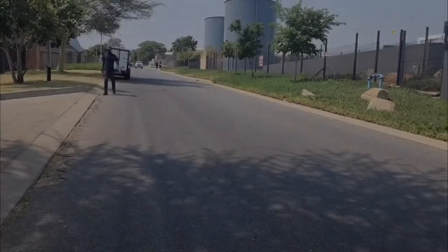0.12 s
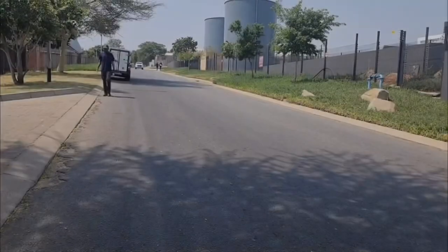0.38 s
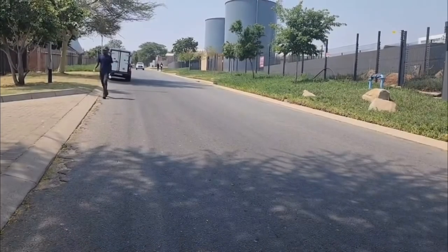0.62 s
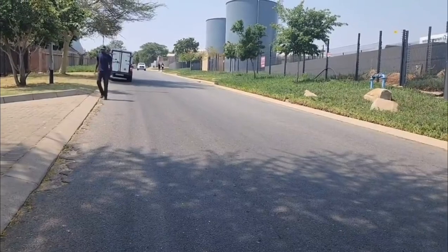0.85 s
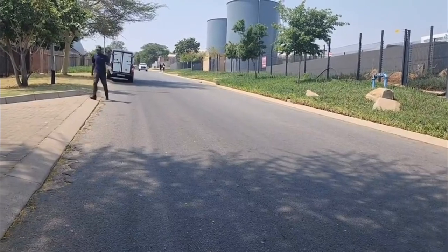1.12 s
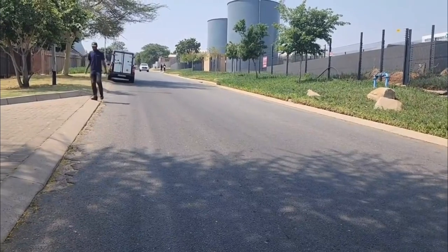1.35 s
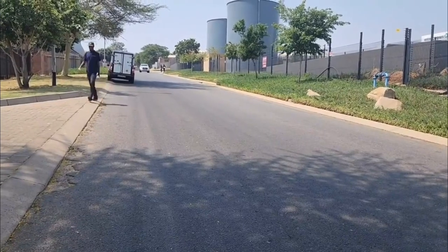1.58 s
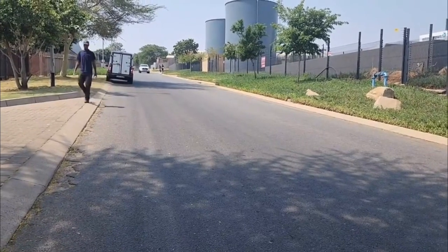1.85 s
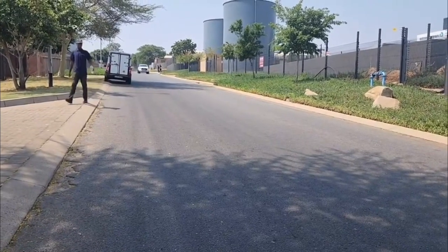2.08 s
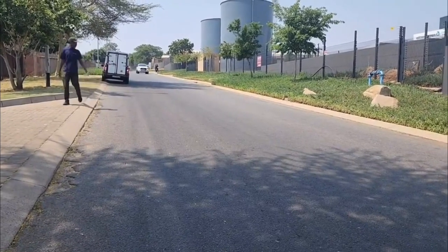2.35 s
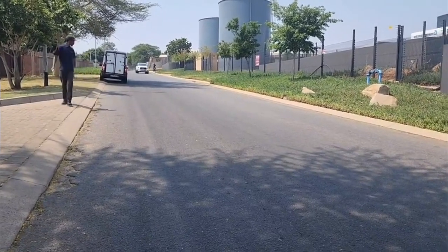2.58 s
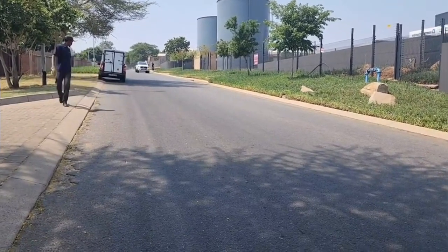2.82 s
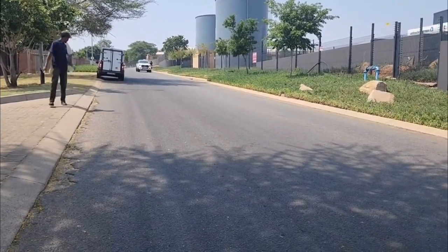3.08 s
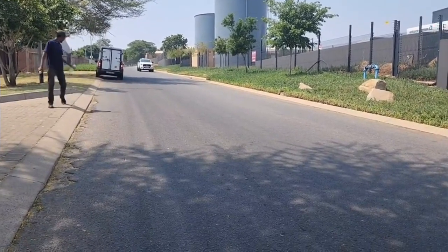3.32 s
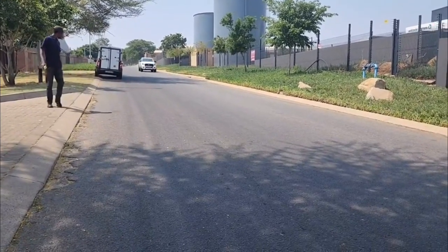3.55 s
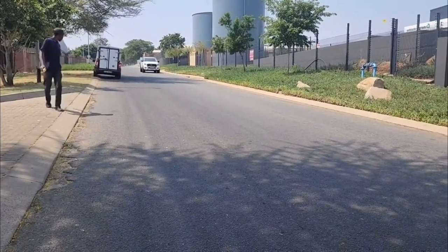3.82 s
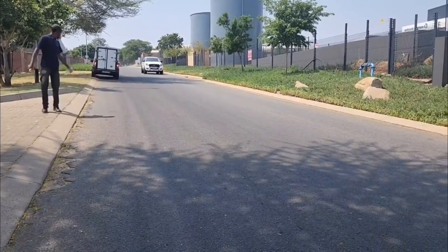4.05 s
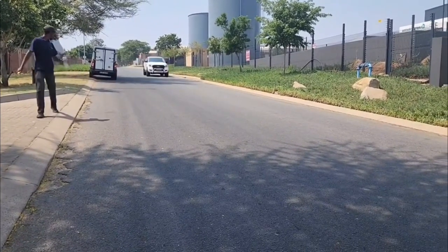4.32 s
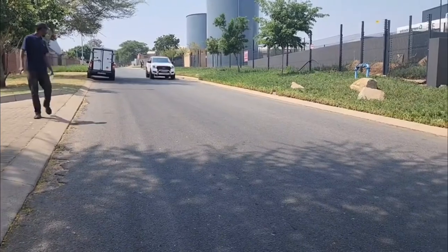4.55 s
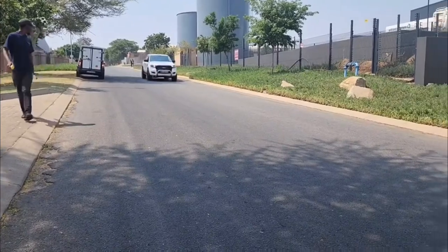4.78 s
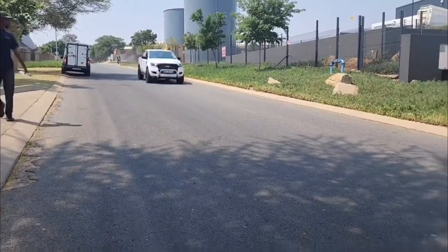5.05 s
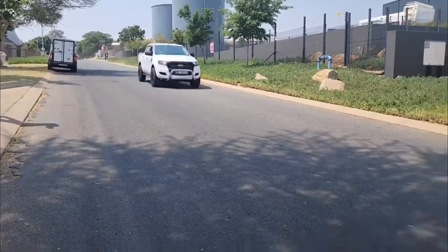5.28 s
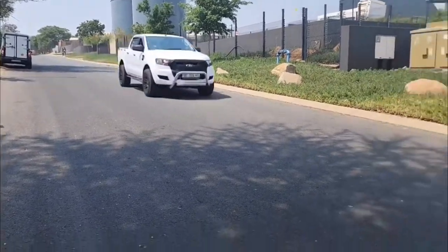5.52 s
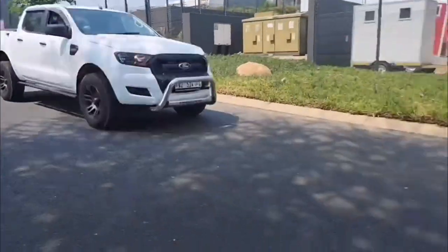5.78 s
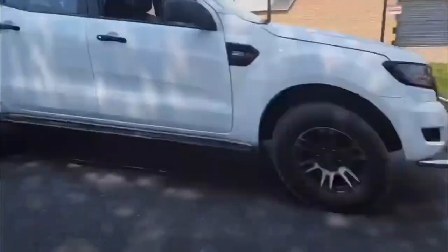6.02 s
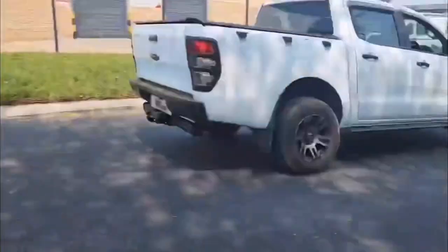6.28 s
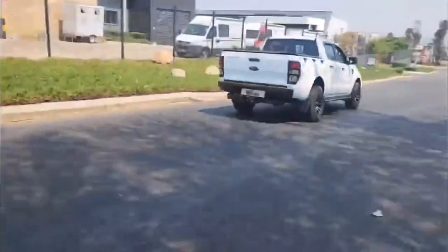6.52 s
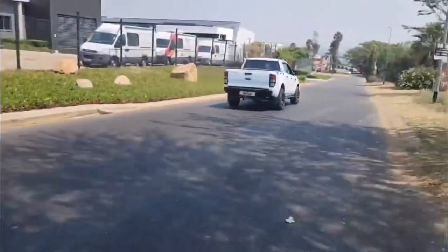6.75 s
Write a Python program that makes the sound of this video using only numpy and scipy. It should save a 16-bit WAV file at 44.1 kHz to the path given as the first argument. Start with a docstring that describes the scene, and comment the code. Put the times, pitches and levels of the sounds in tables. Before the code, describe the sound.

Wavering low diesel drone swells over faint street noise and small scuffs, bursts into exhaust roar, clatter and tyre hiss passing close, then eases.

```python
"""Diesel pickup pass-by

A four-cylinder diesel pickup with an open exhaust accelerates towards a phone at the kerb, changes gear, passes.
Wavering near-sines locked to crank and fan drone over shaped noise: rumble, exhaust roar, clatter, tyre hiss.
Envelopes on noise make a shoe scuff, rustle and ticks nearby; noise on a sine carrier makes a high rasp and chirps.
Steady noise gives far traffic, with fading tyre hiss and hum; light wind thuds on each microphone port apart.
"""
import sys
import numpy as np
from scipy import signal
from scipy.fft import rfft, irfft, next_fast_len
from scipy.io import wavfile
from scipy.ndimage import uniform_filter1d, map_coordinates

SR = 44100
rng = np.random.default_rng(int(sys.argv[2]) if len(sys.argv) > 2 else 0)


def unload_wav(signal):
    """Save mono or channel-first audio to the path in sys.argv[1] as 16-bit WAV at rate SR, clipped to [-1, 1]."""
    wavfile.write(
        sys.argv[1],
        SR,
        np.round(np.clip(np.atleast_2d(signal).T, -1, 1) * 32767).astype(np.int16),
    )


def natural_amplitude(level_db):
    """Convert a level in decibels to a linear amplitude factor, elementwise."""
    exponent = np.asarray(level_db, float) / 20
    return 10 ** exponent


N = 303470
T = np.arange(N) / SR
M = next_fast_len(N + SR // 8)  # transform length
HZ = np.maximum(np.arange(M // 2 + 1) * SR / M, 1)

# Spectra and multiples hold relative levels; mode widths are at half amplitude.
# wind thuds: f/Hz, level/dB
WIND_SPECTRUM = [(15, -8), (35, 6), (70, -7), (130, -3.0), (250, -44.0)]
# gusts dying down: t/s, level/dB
WIND_LEVEL = [(0, -47), (.6, -50), (2, -52), (3, -58), (5, -63), (6.88, -66)]
# distant traffic: f/Hz, level/dB
STREET_SPECTRUM = [(15, -37), (25, -6), (55, 1), (80, -4), (110, 4), (160, -19.5), (221, -5.5), (298, -7.5),
                   (528, -4), (936, -57), (1100, -50), (1450, -4.5), (6000, -48), (7800, -73),
                   (13200, -120)]
STREET_DB = -41
# another car's tyre hiss: f/Hz, level/dB
FAR_TYRE_SPECTRUM = [(1800, -39), (3200, -4), (4500, 1), (6000, -1), (7600, -4.5), (8300, -13), (8900, -39),
                     (10000, -60)]
# its level, fading down the road: t/s, level/dB
FAR_TYRE_LEVEL = [(0, -53.5), (.6, -59.5), (1.2, -56.5), (2, -76), (6.88, -68)]
FAR_HUM_HZ, FAR_HUM_WIDTH_HZ, FAR_HUM_DB = 600, 260, -44.5
FAR_HUM_ATTACK_S, FAR_HUM_HOLD_S, FAR_HUM_RELEASE_S = 0.18, 0.64, 0.37

# shoe dragged over paving: start t/s, hold/s, level/dB
SCUFFS = [(2.731, 0.096, -33), (2.85, 0.096, -39.5), (2.979, 0.036, -44)]
SCUFF_ATTACK_S, SCUFF_RELEASE_S = 0.0046, 0.016
# scuff grit: f/Hz, level/dB
GRIT_SPECTRUM = [(880, -34), (1500, -4), (2350, -6), (2870, -6.5), (7320, -12), (8950, -26), (10200, -35),
                 (11900, -28), (13400, -39)]
# faint bright rustle: start t/s, hold/s, level/dB
RUSTLES = [(0, .62, -75), (.84, 0.074, -67)]
# rustle: f/Hz, level/dB
RUSTLE_SPECTRUM = [(7000, -19), (8800, 0), (10000, -6), (12000, 0), (13400, -11)]
# dry ticks: t/s, rms level at onset/dB
TICKS = [(.385, -58), (.485, -58), (.655, -43), (.691, -56), (1.934, -35)]
# ticks: f/Hz, level/dB
TICK_SPECTRUM = [(1500, -16), (4000, 7), (13000, -19)]
TICK_DECAY_S = 0.0069
# high chirps: t/s, centre f/Hz, level before attack and decay/dB
CHIRPS = [(2.632, 7460, -43), (2.81, 7270, -41), (2.9, 7344, -45), (2.985, 7410, -43.5)]
CHIRP_HALF_WIDTH_HZ, CHIRP_ATTACK_S, CHIRP_DECAY_S = 860, 0.0094, 0.043
# high rasp: t/s, centre f/Hz, level/dB
RASP = [(2.28, 6600, -70), (2.38, 6600, -48), (2.462, 6270, -45), (2.536, 6680, -37), (2.6, 7000, -62)]
RASP_HALF_WIDTH_HZ, RASP_THROB_HZ = 450, 85.5

# engine: t/s, received firing rate f/Hz, load on roar, clatter and fan tones/dB
ENGINE = [(0.0, 104.6, 0.4), (0.5, 109.9, -1.1), (1.0, 114.7, -0.4), (1.3, 116.9, 1.5), (1.6, 119.3, 2.5),
          (1.92, 123.6, 1.3), (2.12, 113.5, -0.4), (2.36, 107.1, -1.9), (2.75, 108.1, 1.5),
          (3.45, 111.9, 2), (3.75, 110.6, 2.5), (3.98, 109.5, 1), (4.14, 104.5, 0.7), (4.3, 104.3, 0.9),
          (4.65, 102.7, 0.1), (5.12, 105.8, -0.3), (5.5, 109.4, 0.64), (6.02, 113.4, -2.5),
          (6.2, 112.1, -0.2), (6.42, 106.3, 0.9), (6.88, 105.9, -0.3)]
# two main firing tones, swelling and sinking with wall echoes: t/s, 1 x level/dB, 2 x level/dB
DRONE = [(0.05, -43.5, -42), (0.33, -28.5, -41.5), (0.47, -39, -40), (0.66, -39, -43), (1.1, -36.5, -47.5),
         (1.4, -35.5, -35), (1.5, -26.5, -39), (1.93, -34, -34), (2.05, -30, -42.5), (2.2, -33, -41.5),
         (2.45, -29, -36), (2.6, -35.5, -38), (2.73, -27.5, -34.5), (2.86, -37, -43), (2.96, -27, -35.5),
         (3.3, -29.5, -38.5), (3.55, -28, -37.5), (3.72, -31, -30.5), (3.93, -44, -31),
         (4.08, -27.5, -30.5), (4.16, -30, -49), (4.27, -34, -31.5), (4.52, -23, -26.5), (4.73, -26, -24),
         (5.3, -20, -25), (5.44, -22, -19.5), (5.6, -15.5, -19), (5.69, -26, -20), (5.78, -14.5, -17),
         (5.95, -18, -16), (6.02, -25, -19.5), (6.09, -14, -17.5), (6.17, -26, -18.5), (6.25, -17, -20),
         (6.44, -24.5, -21), (6.8, -22, -28), (6.88, -18.5, -21)]
# side tones: t/s, uneven-firing level/dB, 3 x firing level/dB, fan blade level before BLADE_LIFT_DB/dB
SIDE_TONES = [(0, -43.5, -67, -65), (.5, -43.5, -49.5, -58), (1.0, -45, -48, -55), (1.4, -48, -54, -47.5),
              (1.9, -40, -51, -46), (2.2, -40.5, -45, -48), (2.6, -39, -49, -48.5),
              (3.0, -34.5, -45, -45.5), (3.4, -37, -42.5, -47.5), (3.8, -32, -44.5, -42),
              (4.2, -30, -39, -39), (4.6, -26, -43, -49), (5.0, -29, -33.5, -43), (5.4, -33, -31, -34.5),
              (5.8, -20, -38, -33), (6.2, -20, -30, -53), (6.6, -31, -43, -50), (6.88, -28.5, -39, -41)]
BLADE_LIFT_DB = 1
# unequal cylinders: multiples of firing rate, level/dB (two rows)
UNEVEN = ([.75, 1.5, 2.5, 2.75], [-18, -14, -13, -17])
# strongest quarter multiples: t/s, then level/dB of each of QUARTER_ORDERS
QUARTERS = [(.2, -54, -59, -46.5, -57, -57), (.7, -52, -58, -52.5, -57, -49),
            (1.2, -54, -56, -51, -52, -51), (1.8, -44, -47, -57.5, -58, -58),
            (2.3, -49, -49, -49, -60, -62), (2.7, -55, -47, -42.5, -61, -57),
            (3.1, -51, -45, -43, -46, -63), (3.5, -40.5, -50, -39.5, -46, -68),
            (3.9, -35, -36, -37.5, -41, -50), (4.3, -42, -40, -38, -63, -37.5),
            (4.7, -49, -35, -37, -52, -52), (5.1, -42, -34, -36, -59, -40), (5.5, -33, -34, -30, -38, -34),
            (5.9, -27, -30, -25.5, -28, -31), (6.2, -24, -40, -26, -32.5, -31),
            (6.5, -24.5, -26, -30, -29, -35), (6.88, -30, -38, -35.5, -34.5, -39)]
# their multiples of firing rate
QUARTER_ORDERS = (1.25, 1.75, 2.25, 5, 5.25)
# weaker tones of the belt-driven fan: multiples of its turn, level/dB (two rows)
FAN = ([3, 7, 9, 11], [-5, -16, -18, -19])
FAN_RATIO = .601  # fan turns per firing, before belt slip
# belt-drive whine: t/s, 13 x fan turn level/dB, 14 x level/dB
WHINE = [(0, -70, -70), (1.2, -66, -70), (1.35, -47, -70), (1.9, -43, -65), (2.15, -47, -60),
         (2.4, -45, -55), (2.9, -44, -47), (3.2, -46, -46), (3.6, -47, -45), (4.0, -46, -50),
         (4.3, -43, -52), (4.7, -45, -48), (5.4, -38, -42), (5.8, -46, -46), (6.3, -50, -48),
         (6.6, -50, -38), (6.88, -55, -42)]
# tones favoured by the tailpipe: multiples of firing rate, level/dB (two rows)
PIPE = ([3.75, 4.25, 4.75, 5.75, 7.5], [-11, -1, 0, -6, -13])
# their level, clear once the pipe points at the phone: t/s, level/dB
PIPE_LEVEL = [(0, -61), (2, -62), (3.5, -52), (4.5, -46), (5.1, -37), (5.6, -41), (6.2, -47), (6.32, -33),
              (6.6, -31.5), (6.88, -32)]

# low rumble: f/Hz, level/dB
RUMBLE_SPECTRUM = [(30, -25), (45, -10), (60, -6), (85, -4.5), (150, -4), (260, -15), (400, -82)]
# exhaust roar: f/Hz, level/dB
ROAR_SPECTRUM = [(70, -9.5), (140, -2), (220, 0.5), (320, -7), (420, -2), (500, -5), (600, -1.5),
                 (750, -6.5), (1100, -11), (2000, -70)]
# front clatter: f/Hz, level/dB
CLATTER_SPECTRUM = [(500, -41), (760, -6.5), (1150, -17.5), (1700, -11), (2300, -26), (2750, -20),
                    (3600, -17), (4600, -19.5), (6000, -28.5)]
# engine-bay ringing: f/Hz, width/Hz, level/dB
BLOCK_MODES = [(903, 110, -3.5), (1360, 231, -1), (1703, 210, -12), (2068, 380, -8.5), (2484, 210, -11.5),
               (2977, 180, -14.5), (3450, 180, -19)]
# rear clatter: f/Hz, level/dB
TAIL_SPECTRUM = [(500, -32.5), (760, -7), (1100, -8.5), (1600, -5.5), (2200, -19), (3000, -17), (4000, -15),
                 (6000, -30)]
# ringing under the load bed: f/Hz, width/Hz, level/dB
BED_MODES = [(532, 63, 5), (913, 82, -8), (1360, 93, -1.5), (1790, 60, -3.5), (4220, 180, -9)]
# front tyre roar ringing in the wheel arches: f/Hz, width/Hz, level/dB
ARCH_MODES = [(565, 115, 1), (723, 73, -8), (882, 160, -0.5)]
# its level: t/s, level/dB
ARCH_LEVEL = [(0, -57), (2, -48.5), (3.5, -40), (4.5, -35.5), (5.1, -29.5), (5.45, -22), (5.8, -19),
              (6.1, -22), (6.3, -26), (6.42, -33), (6.88, -38)]
# tyre hiss: f/Hz, level/dB
HISS_SPECTRUM = [(1800, -37), (3200, -2.5), (4500, 0.5), (6000, -4), (7600, -3), (8300, -9), (8700, -26),
                 (9400, -51)]
# airy top of the hiss: f/Hz, level/dB
AIR_SPECTRUM = [(8000, -35), (8800, 9), (10000, 1), (11600, 4.5), (13400, -6)]
# rear tyre hiss as the wheel goes by: t/s, level/dB
REAR_WHEEL_LEVEL = [(4.8, -91), (5.6, -47), (6.0, -27.5), (6.12, -25.5), (6.16, -32), (6.2, -24.5),
                    (6.28, -23.5), (6.34, -21), (6.38, -23), (6.41, -29), (6.6, -35.5), (6.88, -54)]
REAR_AIR_DB = -16  # rear air relative to rear hiss

CLOSEST_S, TURN_S, MISS_M, SPEED_M_S, SOUND_M_S = 6.083, 6.554, 3.48, 11.14, 343
SHADE_M = 1.6  # travel over which the body comes between a part and the phone
EAR_M, SOURCE_M, ASPHALT, COHERENT_M = 1.4, 0.64, 0.88, 3.2  # heights, road reflection, its reach
# Paths: level/dB, ahead/m, loss per doubled distance/dB, air loss/dB per m, shading after passing/dB
# crank tone
CRANK_PATH = (-49, -2, -1.5, 0, 10)
# fan tones, same columns
FAN_PATH = (-25.5, 3.5, 8, -0.16, 2)
# rumble, same columns
RUMBLE_PATH = (-33, 1, 1.5, 0.07, -1.5)
# roar, same columns
ROAR_PATH = (-15, 2.5, 6, 0.19, 1.4)
# clatter, same columns
CLATTER_PATH = (-18.5, 3, 4.5, 0.07, -1.5)
# hiss, same columns
HISS_PATH = (-24.5, 1.9, 6.5, 0.24, 1)
# air, same columns
AIR_PATH = (-30.5, -0.6, 7.5, 0.57, 8.5)

# two microphone ports: f/Hz, scattered share/dB, left lead/rad, left minus right/dB
PORTS = [(40, -34, 0, 0), (120, -26, .03, 0), (200, -15, .12, .3), (280, -13, .22, .6), (380, -13, .28, .6),
         (520, -13, .35, .6), (780, -2.5, .9, .3), (1050, -2.5, .8, -1.2), (1300, -1.5, 1.5, -2),
         (1550, -2.5, 3.1, -2), (1800, -.6, 4, -2), (2150, -2, 6.2, -2), (2600, -2, 6.5, -2),
         (3500, -.5, 8.5, -4), (7000, -.1, 12, -4.5), (13000, -.1, 20, -3.5)]
TOP_HZ, DRIVE = 13350, .8


def curves(table):
    """Columns of a time table, sample by sample."""
    s, *columns = np.transpose(table)
    return [np.interp(T, s, c) for c in columns]


def over_hz(table):
    """Columns of a frequency table, bin by bin on a log axis."""
    hz, *columns = np.transpose(table)
    return [np.interp(np.log(HZ), np.log(hz), c) for c in columns]


def colour(table):
    """Gain per bin of a spectrum."""
    return natural_amplitude(over_hz(table)[0])


def ringing(modes):
    """Gain per bin of a set of resonances."""
    return sum(natural_amplitude(db) / (1 + (2 * (HZ - hz) / width_hz) ** 2) for hz, width_hz, db in modes)


def unit(x):
    """Scale to rms 1."""
    return x / np.sqrt(np.mean(x ** 2))


def walk(rate_hz):
    """Random levels held 1 / rate_hz s and slewed twice; spread near 1."""
    k = int(SR / rate_hz)
    held = np.repeat(rng.standard_normal(N // k + 1), k)
    return 1.72 * uniform_filter1d(uniform_filter1d(held, k), k)[:N]


def noise(gain):
    """Two unrelated noises of one colour, rms 1."""
    return unit(irfft(rfft(rng.standard_normal((2, M))) * gain, M)[:, :N])


def patchy(gain, patchy_db, rate_hz):
    """Two unrelated noises of one colour whose fifth-octave bands swell and fade each on their own."""
    white = rfft(rng.standard_normal((2, M))) * gain
    step = 5 * np.log2(HZ)
    heard = step[gain > gain.max() / 30]
    total = 0
    for k in range(int(heard.min()), int(heard.max()) + 2):
        band = irfft(white * np.clip(1 - abs(step - k), 0, 1), M)[:, :N]
        total = total + natural_amplitude(patchy_db * walk(rate_hz)) * band
    return unit(total)


def burst(s, attack_s, hold_s, release_s):
    """Envelope: linear attack, hold, exponential release."""
    attack = np.clip((T - s) / attack_s, 0, 1)
    return attack * np.exp(-np.maximum(T - s - attack_s - hold_s, 0) / release_s)


def gated(table, inside_db):
    """Gain of a curve that is silent outside its span."""
    return natural_amplitude(inside_db) * (T > table[0][0]) * (T < table[-1][0])


def wind():
    """Light gusts thud on each port separately."""
    return natural_amplitude(curves(WIND_LEVEL)[0] + 4.3 * walk(3.0)) * noise(colour(WIND_SPECTRUM))


def street():
    """Steady distant traffic, another car's tyre hiss and a far noisy hum that dies away early."""
    traffic = natural_amplitude(STREET_DB) * noise(colour(STREET_SPECTRUM))
    tyres = natural_amplitude(curves(FAR_TYRE_LEVEL)[0] + .8 * walk(6.1)) * noise(colour(FAR_TYRE_SPECTRUM))
    hum_gain = natural_amplitude(FAR_HUM_DB) * burst(0, FAR_HUM_ATTACK_S, FAR_HUM_HOLD_S, FAR_HUM_RELEASE_S)
    hum = hum_gain * noise(ringing([(FAR_HUM_HZ, FAR_HUM_WIDTH_HZ, 0)]))
    return traffic + tyres + hum


def scuff():
    """Shoe drags: bursts of gritty, patchy noise."""
    drag = sum(natural_amplitude(db) * burst(s, SCUFF_ATTACK_S, hold_s, SCUFF_RELEASE_S) for s, hold_s, db in SCUFFS)
    return drag * patchy(colour(GRIT_SPECTRUM), 2.1, 40.45)


def rustle():
    """Faint bursts of bright, patchy noise."""
    envelope = sum(natural_amplitude(db) * burst(s, .03, hold_s, .02) for s, hold_s, db in RUSTLES)
    return envelope * patchy(colour(RUSTLE_SPECTRUM), 2.2, 20)


def ticks():
    """Short dry ticks: bright noise with instant onset and exponential decay."""
    decays = sum(natural_amplitude(db) * (T >= s) * np.exp(-np.maximum(T - s, 0) / TICK_DECAY_S) for s, db in TICKS)
    return decays * noise(colour(TICK_SPECTRUM))


def chirps():
    """Brief rough bands near 7 kHz that start sharply and fade; low noise multiplies a sine."""
    rough = noise(1 / (1 + (HZ / CHIRP_HALF_WIDTH_HZ) ** 4))
    carrier = 0
    for s, hz, db in CHIRPS:
        envelope = natural_amplitude(db) * burst(s, CHIRP_ATTACK_S, 0, CHIRP_DECAY_S)
        carrier = carrier + envelope * np.sqrt(2) * np.sin(2 * np.pi * hz * T)
    return rough * carrier


def rasp():
    """A narrow, rough, throbbing band at 6-7 kHz; low noise multiplies a gliding sine."""
    hz, db = curves(RASP)
    rough = noise(1 / (1 + (HZ / RASP_HALF_WIDTH_HZ) ** 4))
    throb = 1 + 0.16 * np.sin(2 * np.pi * RASP_THROB_HZ * T)
    return gated(RASP, db) * throb * rough * np.sqrt(2) * np.sin(2 * np.pi * np.cumsum(hz) / SR)


def passing(db, ahead_m, spread_db, air_db, shade_db):
    """Level in dB of one part of the truck as it nears, passes and leaves."""
    along_m = SPEED_M_S * (T - CLOSEST_S) + ahead_m
    metres = np.hypot(MISS_M, along_m)
    shade = shade_db * (.5 + .5 * np.tanh(along_m / SHADE_M))
    return db - spread_db * np.log2(metres / MISS_M) - air_db * (metres - MISS_M) - shade


def shifting(x):
    """Motion raises the ringing on approach and lowers it on leaving; it also wanders a little."""
    along_m = SPEED_M_S * (T - CLOSEST_S)
    pace = 1 - SPEED_M_S / SOUND_M_S * along_m / np.hypot(MISS_M, along_m) + .007 * walk(1.5)
    at = np.cumsum(pace)
    return np.array([map_coordinates(c, [at], mode="mirror") for c in x])


def road_echo(x):
    """A second path off the asphalt; its extra length grows as the truck nears, sweeping dips through the noise."""
    metres = np.hypot(MISS_M, SPEED_M_S * (T - CLOSEST_S))
    extra_m = np.hypot(metres, EAR_M + SOURCE_M) - np.hypot(metres, EAR_M - SOURCE_M)
    strength = ASPHALT / (1 + (metres / COHERENT_M) ** 2)  # rough air blurs it far away
    late = np.array([np.interp(T - extra_m / SOUND_M_S, T, c) for c in x])
    return (x + strength * late) / np.sqrt(1 + strength ** 2)


def tone(turns, db, waver_db, order, blur_rad=.16):
    """Near-sine locked to a shaft; air and echoes make phase and level waver."""
    drift = blur_rad * np.sqrt(order) * walk(18) + 2 * np.pi * rng.random()
    return np.sqrt(2) * natural_amplitude(db + waver_db * walk(5)) * np.sin(2 * np.pi * order * turns + drift)


def family(turns, table, level_db):
    """Tones at the table's multiples of one shaft's turns."""
    return sum(tone(turns, level_db + db, 1.8, order) for order, db in zip(*table))


def firing_tones(fired):
    """Multiples of the firing rate: crank turn, main tones, uneven cylinders and tailpipe."""
    firing_db, second_db = curves(DRONE)
    uneven_db, third_db, _ = curves(SIDE_TONES)
    out = tone(fired, passing(*CRANK_PATH), 4, order=.5)
    out = out + tone(fired, firing_db, 1.1, order=1)
    out = out + tone(fired, second_db, 1.1, order=2)
    out = out + tone(fired, third_db, 1.8, order=3, blur_rad=.1)
    for order, db in zip(QUARTER_ORDERS, curves(QUARTERS)):
        out = out + tone(fired, db, 2.45, order, blur_rad=0.24)
    return out + family(fired, UNEVEN, uneven_db) + family(fired, PIPE, curves(PIPE_LEVEL)[0])


def fan_tones(hz):
    """Multiples of the fan's turn; its belt slips at high revs."""
    slip = .0009 * np.maximum(hz - 111, 0)
    fan = np.cumsum(FAN_RATIO * hz * (1 - slip)) / SR
    fan_db = passing(*FAN_PATH) + curves(ENGINE)[1]
    blade_db = curves(SIDE_TONES)[2] + BLADE_LIFT_DB
    out = tone(fan, passing(*CRANK_PATH) - 4, 2.6, order=1)
    out = out + tone(fan, fan_db, 2.0, order=2)
    out = out + tone(fan, blade_db, 1.5, order=6, blur_rad=.09)
    for order, db in zip((13, 14), curves(WHINE)):
        out = out + tone(fan, db, 1.5, order, blur_rad=.09)
    return out + family(fan, FAN, fan_db)


def rumble():
    """Low noise, its level wandering."""
    return natural_amplitude(passing(*RUMBLE_PATH) + 3.7 * walk(7)) * noise(colour(RUMBLE_SPECTRUM))


def exhaust_roar(puff, load_db):
    """Noise puffed at each firing, echoed by the road."""
    level = natural_amplitude(passing(*ROAR_PATH) + load_db + 1.5 * walk(9))
    return road_echo(level * (1 + 0.11 * puff) * noise(colour(ROAR_SPECTRUM)))


def clatter(puff, load_db):
    """Patchy noise through engine-bay ringing, then load-bed ringing once the tail faces the phone."""
    rear = .5 + .5 * np.tanh((T - TURN_S) / 0.1)
    front_clatter = patchy(.65 * colour(CLATTER_SPECTRUM) + ringing(BLOCK_MODES), 1.3, 22)
    rear_clatter = patchy(colour(TAIL_SPECTRUM) + 0.65 * ringing(BED_MODES), 3.2, 14)
    mixed = np.sqrt(1 - rear) * front_clatter + np.sqrt(rear) * rear_clatter
    return natural_amplitude(passing(*CLATTER_PATH) + load_db) * (1 + 0.086 * puff) * shifting(mixed)


def wheel_arches():
    """Front tyre roar: noise through Doppler-shifted arch resonances."""
    return natural_amplitude(curves(ARCH_LEVEL)[0] + 1.1 * walk(8.7)) * shifting(noise(ringing(ARCH_MODES)))


def tyre_hiss(puff):
    """Patchy tread noise and its airy top, front and rear powers summed."""
    rear_db = curves(REAR_WHEEL_LEVEL)[0]
    # single tread blocks stand out close by
    near = (MISS_M / np.hypot(MISS_M, SPEED_M_S * (T - CLOSEST_S))) ** .5
    smooth = np.sqrt(1 - near) * patchy(colour(HISS_SPECTRUM), 1.5, 24)
    blocky = np.sqrt(near) * patchy(colour(HISS_SPECTRUM), 3.14, 18)
    hiss = np.hypot(natural_amplitude(passing(*HISS_PATH)), natural_amplitude(rear_db)) * (1 + 0.073 * puff) * (smooth + blocky)
    air_gain = np.hypot(natural_amplitude(passing(*AIR_PATH)), natural_amplitude(rear_db + REAR_AIR_DB))
    return hiss + air_gain * patchy(colour(AIR_SPECTRUM), 2.1, 12)


def truck():
    """Engine tones plus rumble, roar, clatter and tyres, as direct and scattered sound."""
    hz, load_db = curves(ENGINE)
    fired = np.cumsum(hz) / SR
    puff = np.cos(2 * np.pi * fired)
    drone = firing_tones(fired) + fan_tones(hz)
    tonal = np.array([drone, np.roll(drone, 700)])  # scattered copy lags 700 samples
    body = rumble() + exhaust_roar(puff, load_db) + clatter(puff, load_db)
    return tonal + body + wheel_arches() + tyre_hiss(puff)


def ports(direct, scattered):
    """Left port hears the right one's sound shifted in phase, partly replaced by scattered sound."""
    scattered_db, lead_rad, pan_db = over_hz(PORTS)
    share = np.clip(natural_amplitude(scattered_db), 0, 1)
    a, b = rfft(direct, M), rfft(scattered, M)
    left = (np.sqrt(1 - share ** 2) * a + share * b) * np.exp(1j * lead_rad) * natural_amplitude(pan_db / 2)
    right = a * natural_amplitude(-pan_db / 2)
    return irfft(np.array([left, right]), M)[:, :N]


def scene():
    """All sources reach both ports; wind acts on the ports themselves."""
    nearby = scuff() + rustle() + ticks() + chirps() + rasp()
    return ports(*(street() + nearby + truck())) + wind()


def roll_off(x):
    """The treble ends steeply here."""
    return signal.sosfilt(signal.butter(12, 13710, fs=SR, output="sos"), x)


def record(dry):
    """The phone rounds the loudest peaks and cuts the top."""
    top = signal.ellip(8, .2, 70, TOP_HZ, fs=SR, output="sos")
    rounded = np.tanh(DRIVE * dry) / DRIVE
    return roll_off(signal.sosfilt(top, rounded))


dry = scene()
out = record(dry)
unload_wav(out)
```